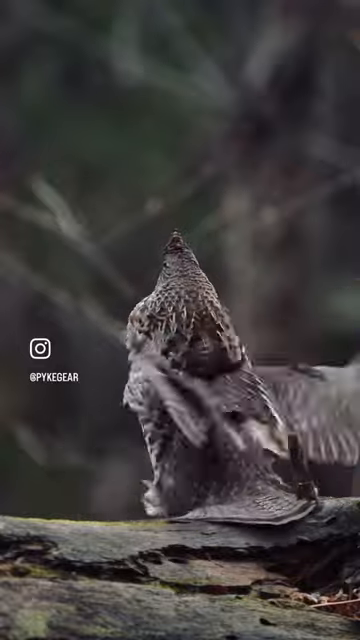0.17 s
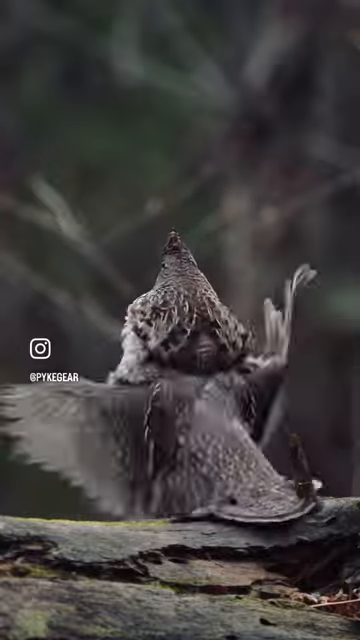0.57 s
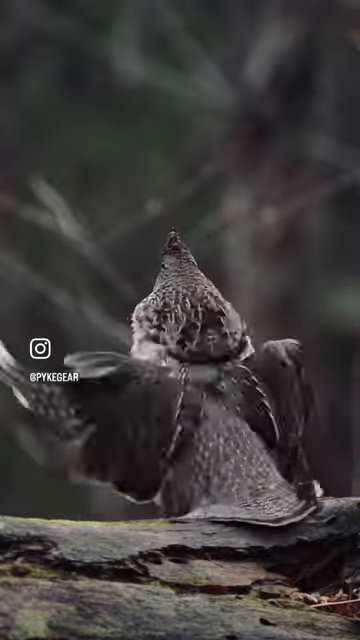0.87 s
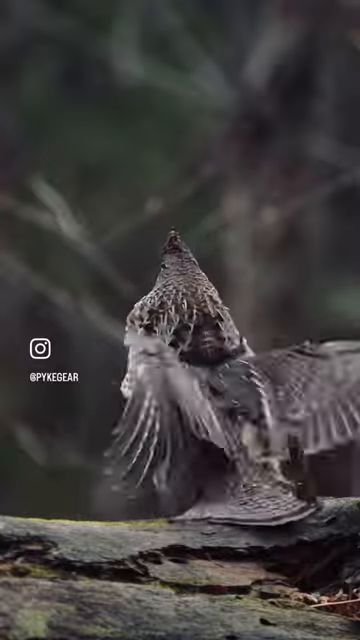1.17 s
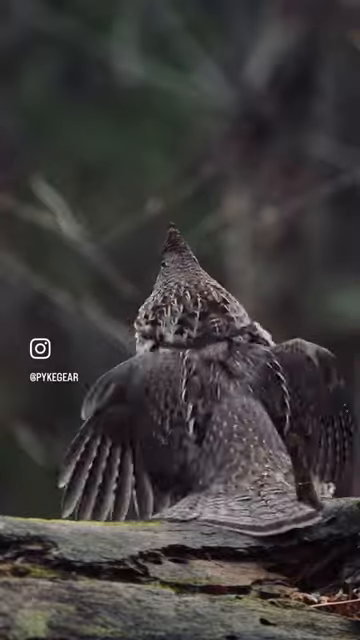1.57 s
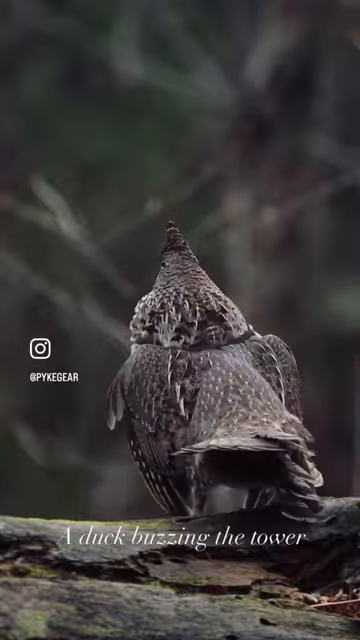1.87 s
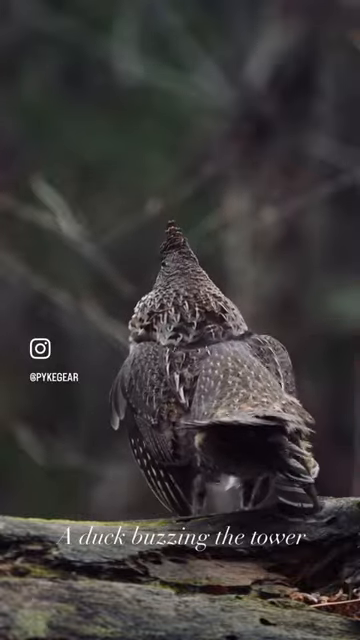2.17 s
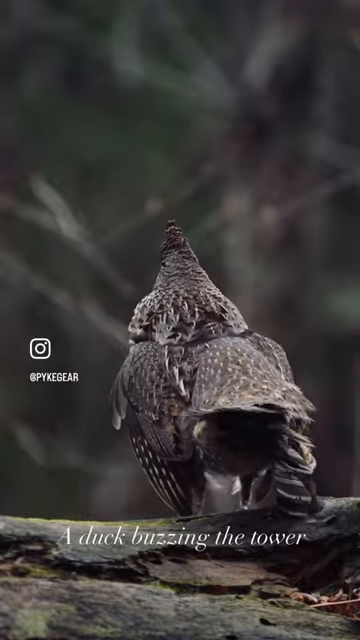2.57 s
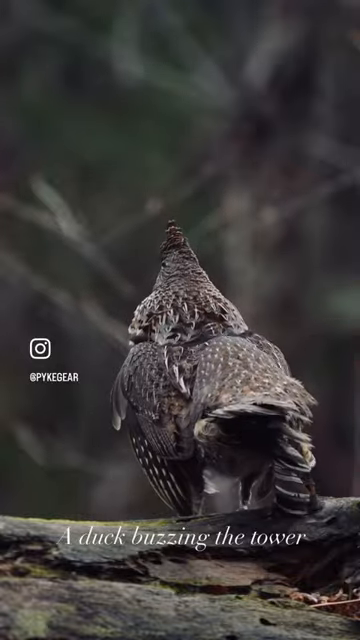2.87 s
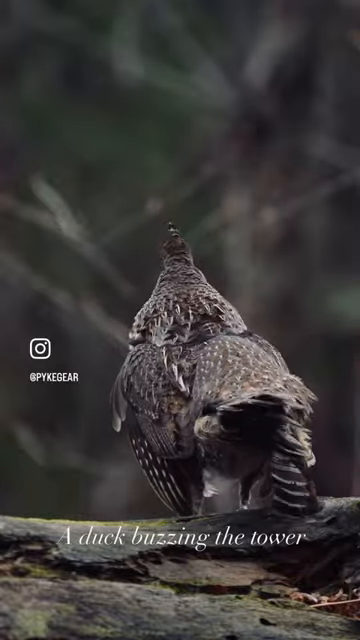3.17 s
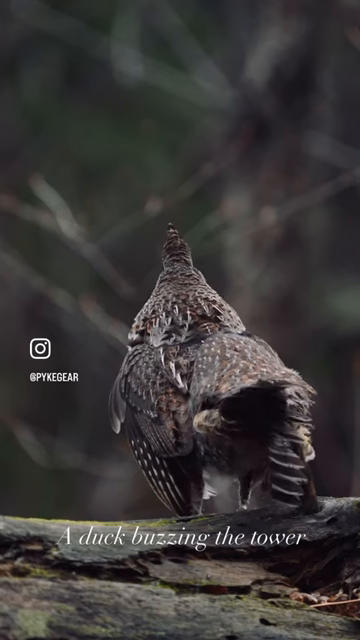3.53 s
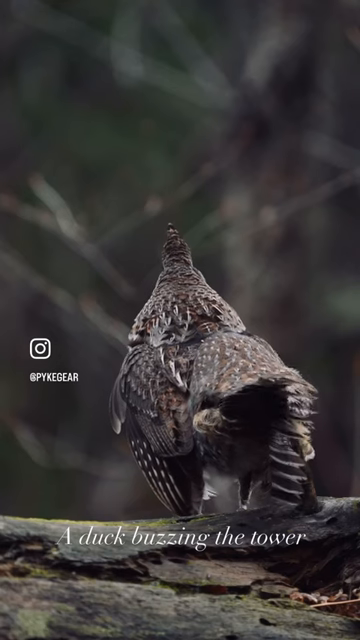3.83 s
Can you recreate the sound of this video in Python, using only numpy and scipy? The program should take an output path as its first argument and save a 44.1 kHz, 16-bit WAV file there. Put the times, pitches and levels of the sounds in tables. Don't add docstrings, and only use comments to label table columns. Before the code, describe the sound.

A grouse on a log beats its wings in fast, deep, feathery thumps that slow and stop; a fainter grouse drums farther off, a duck quacks repeatedly, frogs peep softly in woods. Close outdoor microphone.

```python
import sys
import numpy as np
from scipy import signal
from scipy.fft import rfft, irfft, next_fast_len
from scipy.io import wavfile
from scipy.ndimage import uniform_filter1d, minimum_filter1d, map_coordinates

SR = 44100
rng = np.random.default_rng(int(sys.argv[2]) if len(sys.argv) > 2 else 0)


def master(y):
    cut = np.clip(np.atleast_2d(y).T, -1, 1)
    pcm = np.round(cut * 32767)
    wavfile.write(sys.argv[1], SR, pcm.astype(np.int16))


def attenuation_scalar(level_db):
    decades = np.asarray(level_db, float) / 20
    return 10 ** decades


N = 176400

# [t/s, level/dB]
WIND_LEVEL = [(0.0, -19.5), (0.75, -25), (0.88, -13.5), (1.02, -25.5), (1.15, -15.5), (1.21, -25),
              (1.68, -22), (1.87, -33.5), (2.0, -15.5), (2.13, -40), (2.22, -17), (2.38, -28.5),
              (2.44, -14.5), (3.14, -18.5), (3.21, -10), (4.0, -22.5)]
# [f/Hz, level/dB]
WIND_COLOUR = [(2, -36), (6, -1.5), (11, -3), (18, -2), (24, -24.5), (45, -25), (110, -44.5)]
# [f/Hz, level/dB per Hz]
HUSH_COLOUR = [(110, -2), (350, -4.5), (900, -12), (1600, -14.5), (4000, -22), (9500, -27), (9800, -28.5),
               (15600, -29.5)]
# [t/s, level/dB]
CHORUS_LEVEL = [(0.0, -44.5), (0.34, -43.5), (1.21, -47), (1.59, -41.5), (1.94, -51.5), (2.32, -42),
                (2.52, -54.5), (2.76, -56), (3.07, -35), (3.64, -69), (3.88, -44), (4.0, -32)]
# [f/Hz, level/dB]
CHORUS_COLOUR = [(1800, -18), (2150, -3.5), (2450, -7), (2700, 0), (2850, -8.5), (3050, -52)]
# [t/s, thump level/dB, feather puff level/dB, wing-tip hiss level/dB]
NEAR_BEATS = [(.0092, -1.5, -26, -46), (0.0868, -3, -29, -45), (.16, -2.5, -27.5, -41.5),
              (0.224, -3.5, -25.5, -43), (0.2805, 0, -19, -56), (.3326, -0.5, -22, -52),
              (0.3972, 0, -22, -49), (.4673, -2.5, -27, -46.5), (0.5422, -4, -29, -40),
              (0.627, -2.5, -27.5, -43), (0.7176, -2, -24.5, -38.5), (0.8174, -1, -24, -43),
              (0.9246, -2, -25.5, -45), (1.041, -3.5, -27, -42), (1.166, -3.5, -28, -48),
              (1.299, -4.5, -25, -50), (1.4445, -4.5, -25.5, -43.5)]
# [f/Hz, level/dB per Hz]
FEATHER_COLOUR = [(110, 9.5), (200, -4.5), (400, -3), (1200, -5), (2200, -15.5), (4200, -23), (8800, -32),
                  (15500, -60)]
# [f/Hz, level/dB]
HISS_COLOUR = [(2500, 4), (5000, 0), (9000, 1), (15600, -5)]
# [f/Hz, level/dB]
FLUTTER_COLOUR = [(120, 0.5), (165, 0.5), (205, -3.5), (260, -26.5)]
# [f/Hz, level/dB]
RUSTLE_COLOUR = [(2500, 6), (4000, 1), (9300, -7), (9800, -19), (15600, -15)]
# [t/s, peak level/dB]
QUILL_CLICKS = [(.079, -21), (0.134, -18.5), (.202, -12.5), (.213, -18), (0.268, -23), (0.278, -14),
                (.322, -18), (0.329, -20), (.375, -15.5), (.395, -21), (.444, -16), (.463, -17),
                (.537, -24), (.625, -25), (.815, -25), (.916, -23), (0.921, -22), (1.041, -21),
                (1.167, -21.5), (1.296, -20)]
# [start t/s, length t/s, level/dB, rasp level/dB, rasp f/Hz]
QUACK_CALLS = [
    (0.491, 0.26, -37, -20, 5140),
    (1.277, 0.27, -31.5, -24, 5630),
    (2.067, 0.27, -30, -22.5, 5060),
    (2.887, .272, -30, -19.5, 6000),
    (3.813, 0.3, -25, -20.5, 5200),
]
# [share of length, effort level/dB, throat f/Hz, throat level/dB, bill f/Hz]
QUACK_COURSE = [
    (0, -10, 1760, 0.5, 2000),
    (.15, -5.5, 1770, 3, 2040),
    (.4, -2, 1790, -1, 2164),
    (.7, 0.5, 1850, -4, 2310),
    (.86, -0.5, 1855, -5, 2270),
    (.92, -4, 1660, 0, 2127),
    (1, -15, 1615, 6, 2100),
]
# [throat level/dB, head level/dB, chest level/dB, fizz level/dB, bill pitch ratio]
QUACK_COLOURS = [
    (-1, -7.5, -15, 2, 1),
    (-2.5, -4, -15, 2, 1.02),
    (-1, -3.5, -19, 3, .97),
    (-1.5, -3.5, -9, 2.5, 1.02),
    (-2, -3.5, -20, 7, .99),
]
REED_RATES = [76, 90]
PITCH_SPREAD = [.028, .03, .015, .03, .008, .11]
# [f/Hz, level/dB]
FIZZ_COLOUR = [(4500, -10), (5100, 0), (7000, -0.5), (7900, -10.5)]
# [t/s, length t/s, f/Hz, level/dB]
BRIGHT_NOTES = [(0.52, 0.033, 2750, -42), (.605, .015, 2100, -38), (.68, .06, 2330, -37),
                (0.83, .06, 2750, -42), (1.557, .03, 2600, -36), (2.228, 0.022, 2750, -34),
                (2.297, 0.048, 2600, -32.5), (3.034, 0.033, 2670, -26.5), (3.109, 0.027, 2200, -24),
                (3.793, 0.013, 1050, -39), (2.24, 0.12, 5210, -46), (2.225, .05, 2180, -31),
                (2.16, .03, 2120, -32), (1.47, 0.063, 2450, -36), (3.145, 0.022, 1600, -37)]
# [t/s, length t/s, f/Hz, level/dB]
CHIP_NOTES = [
    (1.245, 0.054, 4200, -46.5),
    (1.616, 0.02, 4300, -48),
    (1.645, 0.037, 3550, -49),
    (1.79, .05, 4220, -52),
    (1.853, .06, 4200, -55),
    (3.756, 0.027, 4330, -52),
]
# [t/s, thump level/dB]
FAR_BEATS = [(1.3556, -19), (1.509, -20), (1.6523, -22), (1.7877, -19), (1.9146, -22.0), (2.0346, -20.5),
             (2.1474, -22.5), (2.2533, -20), (2.3545, -21.5), (2.4523, -23), (2.5416, -23.5), (2.6269, -22),
             (2.7065, -23.5), (2.7812, -23), (2.8508, -20.5), (2.9145, -23.5), (2.973, -18), (3.027, -19.5),
             (3.0851, -22), (3.1507, -24.5), (3.2194, -27), (3.2933, -25.5), (3.3727, -26), (3.4584, -26),
             (3.5495, -23.5), (3.6493, -21.5), (3.7563, -21), (3.8722, -24)]
# [start t/s, length t/s, level/dB, f/Hz]
TRILL_CALLS = [
    (1.463, 0.65, -51, 2540),
    (3.1, 0.54, -51, 2540),
    (2.4, 0.12, -55.5, 2650),
    (2.82, 0.34, -50, 2830),
    (1.52, .5, -54.5, 2850),
]
# [t/s, level/dB, f/Hz]
WIND_KNOCKS = [
    (1.58, -37.5, 130),
    (2.43, -33.5, 190),
    (4, -35, 240),
    (2.1, -46, 160),
]

TIME = np.arange(N) / SR


def unit(x):
    return x / np.sqrt(np.mean(x ** 2) + 1e-20)


def filtered(x, response):
    m = next_fast_len(N + SR)
    return irfft(rfft(x, m) * response(np.fft.rfftfreq(m, 1 / SR)), m)[:N]


def noise(colour):
    f, db = np.transpose(colour)
    octaves = np.log(np.r_[f[0] / 2, f, f[-1] * 2])
    levels = np.r_[-90, db, -90]
    shape = lambda hz: attenuation_scalar(np.interp(np.log(hz + 1e-3), octaves, levels))
    return unit(filtered(rng.standard_normal(N), shape))


def wobble(rate):
    knots = rng.standard_normal(int(N * rate / SR) + 4)
    return map_coordinates(knots, [np.arange(N) * rate / SR])


def level(rows):
    s, db = np.transpose(rows)
    return attenuation_scalar(np.interp(TIME, s, db))


def bump(s, rise_s, fall_s):
    t = TIME - s
    return np.exp(-.5 * (t / np.where(t < 0, rise_s, fall_s)) ** 2)


def tone(hz, bend):
    return np.sin(2 * np.pi * hz * TIME + bend)


def thumps(beats, pump_s):
    lag_s, low_cut_hz = .001, 20
    u = (TIME - lag_s - np.array(beats)[:, :1]).astype(np.float32) / pump_s
    pulses = (u * u - 1) * np.exp(-np.minimum(u * u, 60) / 2)
    push = attenuation_scalar(np.array(beats)[:, 1]) @ pulses
    return filtered(push, lambda f: -f * f / (low_cut_hz ** 2 - f * f + 1j * f * low_cut_hz))


def wind_and_hush():
    hush = attenuation_scalar(-41 + 0.99 * wobble(2.44) + 0.62 * wobble(20))
    return level(WIND_LEVEL) * noise(WIND_COLOUR) + hush * noise(HUSH_COLOUR)


def frog_chorus():
    clumps = attenuation_scalar(-1.0 + 2.1 * wobble(27.76) + 1.1 * wobble(7.48))
    return level(CHORUS_LEVEL) * clumps * noise(CHORUS_COLOUR)


def near_grouse():
    hiss_s, swish_s, click_s = 0.0042, 0.036, 0.0014
    snap_s, snap_hz = 0.00065, 1120
    puffs = sum(attenuation_scalar(db) * bump(s - 0.0011, 0.0081, 0.0059) for s, _, db, _ in NEAR_BEATS)
    hiss = sum(attenuation_scalar(db) * bump(s - hiss_s, hiss_s / 2, hiss_s) for s, _, _, db in NEAR_BEATS)
    swish = sum(attenuation_scalar(-34.5 - 2.5 * s) * bump(s, swish_s, swish_s / 2) for s, *_ in NEAR_BEATS)
    clicks = sum(attenuation_scalar(db - 7.5) * bump(s, click_s / 4, click_s) for s, db in QUILL_CLICKS)
    snaps = sum(attenuation_scalar(db - 5) * bump(s, snap_s / 2, snap_s) * np.cos(2 * np.pi * snap_hz * (TIME - s))
                for s, db in QUILL_CLICKS)
    grit = attenuation_scalar(3.25 * wobble(450))
    out = attenuation_scalar(1.75) * thumps(NEAR_BEATS, .004) - snaps
    out += (puffs * grit + clicks) * noise(FEATHER_COLOUR)
    out += (hiss + attenuation_scalar(-18.5) * clicks) * noise(HISS_COLOUR)
    out += swish * noise(FEATHER_COLOUR)
    out += (attenuation_scalar(-0.5) * swish + attenuation_scalar(-6) * puffs) * noise(FLUTTER_COLOUR)
    return out + attenuation_scalar(-11) * swish * noise(RUSTLE_COLOUR)


def among_trees(x):
    t = np.arange(SR) / SR
    woods_t60_s, near_t60_s = .35, .05
    fade = attenuation_scalar(-60 * t / woods_t60_s) + attenuation_scalar(13 - 60 * t / near_t60_s)
    tail = rng.standard_normal(SR) * fade
    return x + attenuation_scalar(-8) * signal.fftconvolve(x, tail / np.linalg.norm(tail))[:N]


def duck():
    swell_s, ring_s = .0015, .0022
    head_hz, edge_hz, chest_hz = 2636, 3350, 1433
    head_grows, rasp_grows = 2.93, 2.17
    stagger_s = .004
    glide_per_s = 20
    out, gate = np.zeros(N + SR), np.zeros(N + SR)
    t = np.arange(600) / SR
    u = t - 3 * swell_s
    share, *controls = np.transpose(QUACK_COURSE)

    def shape(late):
        return np.exp(-.5 * ((u - late) / np.where(u < late, swell_s, ring_s)) ** 2)

    for call, colour in zip(QUACK_CALLS, QUACK_COLOURS):
        start, length, db, rasp_db, rasp_hz = call
        low_db, head_db, chest_db, fizz_db, ratio = colour
        s = 0
        chances, gusts = rng.standard_normal((40, 16)), rng.standard_normal((40, 5, len(t)))
        for d, gust in zip(chances, gusts):
            if s > length:
                break
            effort, throat_hz, throat_db, bill_hz = (np.interp(s / length, share, c) for c in controls)
            per_s = np.interp(s / length, [.12, .64], REED_RATES)
            rasp = rasp_grows * effort
            parts = [(ratio * bill_hz, effort), (throat_hz, effort + throat_db + low_db),
                     (head_hz, head_grows * effort - 1 + head_db), (edge_hz, rasp - 19.5),
                     (rasp_hz, rasp + rasp_db), (chest_hz, effort + chest_db)]
            breath = 1 + .35 * unit(uniform_filter1d(gust, size=60))
            ring = 0
            for k, (f, g) in enumerate(parts):
                late = stagger_s * np.log2(min(f, head_hz) / throat_hz)
                pitch = f * (1 + PITCH_SPREAD[k] * d[k + 5])
                wave = np.sin(2 * np.pi * pitch * (t + glide_per_s * u * u / 2) + d[k + 10])
                ring = ring + attenuation_scalar(g + 2 * d[k]) * breath[k % 5] * shape(late) * wave
            at = round((start + s + .04 * d[15] / per_s - 3 * swell_s) * SR)
            out[at:][:len(t)] += attenuation_scalar(db + 4.0) * ring
            gate[at:][:len(t)] += attenuation_scalar(db + 4 + rasp + rasp_db + fizz_db) * shape(0)
            s = s + 1 / per_s
    fizz = uniform_filter1d(gate[:N], size=260) * noise(FIZZ_COLOUR)
    return among_trees(out[:N] + fizz)


def bright_notes():
    out = np.zeros(N)
    for s, length, hz, db in BRIGHT_NOTES:
        throb = 3.5 * (0.5 + np.cos(2 * np.pi * 90 * (TIME - s)))
        loud = attenuation_scalar(db + 1.6 * wobble(82) - throb)
        out += loud * bump(s, length / 3, length / 2) * tone(hz, 0.43 * wobble(60))
    return out


def small_birds():
    return sum(attenuation_scalar(db) * bump(s, length / 3, length / 2) * tone(hz, 1.3 * wobble(120))
               for s, length, hz, db in CHIP_NOTES)


def far_grouse():
    return attenuation_scalar(1.44) * thumps(FAR_BEATS, 0.0044)


def frog_trills():
    out = np.zeros(N)
    for s, length, db, hz in TRILL_CALLS:
        pulse = np.sin(2 * np.pi * 26 * TIME + 1.7 * wobble(6))
        beat = attenuation_scalar(3.5 * (pulse - 1) + 1.0 * wobble(20))
        swell = bump(s + length / 3, length / 4, length / 2.1)
        out += 2 * attenuation_scalar(db) * swell * beat * tone(hz, 1.05 * wobble(30.1))
    return out


def wind_knocks():
    return sum(attenuation_scalar(db) * bump(s, 0.024, 0.024) * tone(hz, 1.4 * wobble(60)) for s, db, hz in WIND_KNOCKS)


def scene():
    birds = near_grouse() + duck() + small_birds() + far_grouse()
    callers = frog_chorus() + bright_notes() + frog_trills()
    return (wind_and_hush() + birds + callers + wind_knocks())[None]


def band_limit(x):
    return signal.sosfilt(signal.butter(12, 15680, fs=SR, output="sos"), x)


def record(dry):
    ceiling, hold_s = 0.87, 0.0044
    span = int(hold_s * SR)
    needed = np.minimum(1, ceiling / (np.abs(dry) + 1e-9))
    gain = uniform_filter1d(minimum_filter1d(needed, size=2 * span), size=span)
    mix = filtered((dry * gain)[0], lambda hz: hz < 15700)[None]
    return band_limit(mix)


dry = scene()
out = record(dry)
master(out)
```